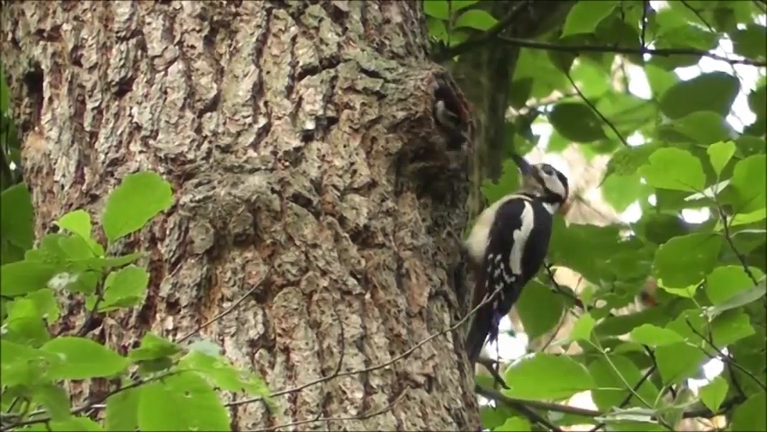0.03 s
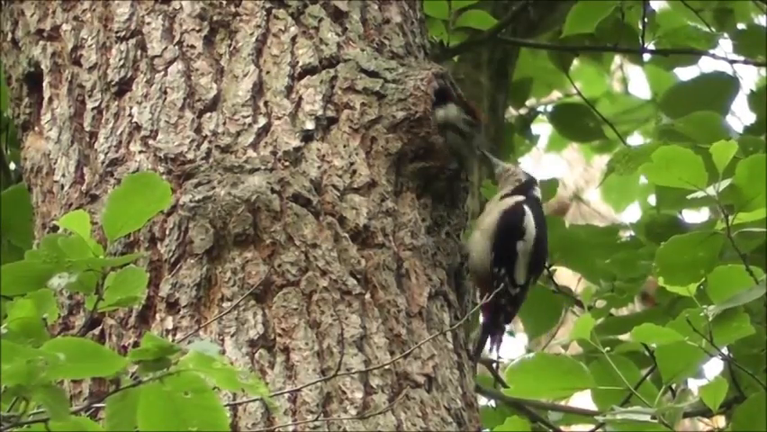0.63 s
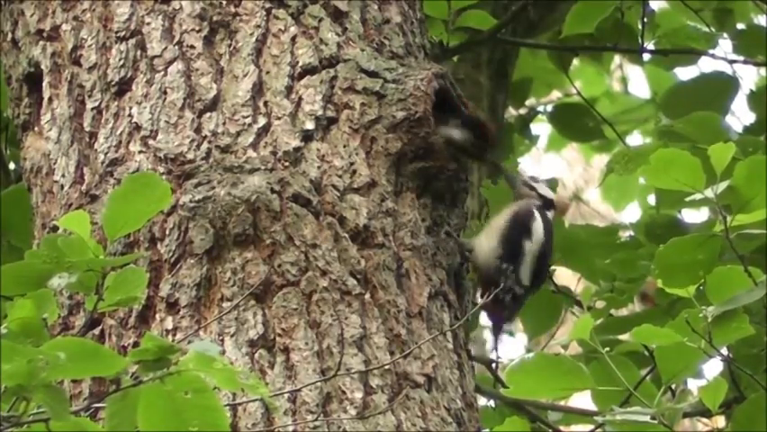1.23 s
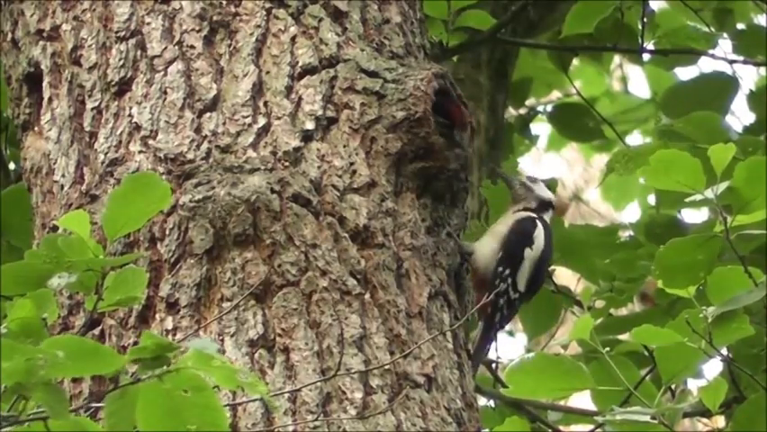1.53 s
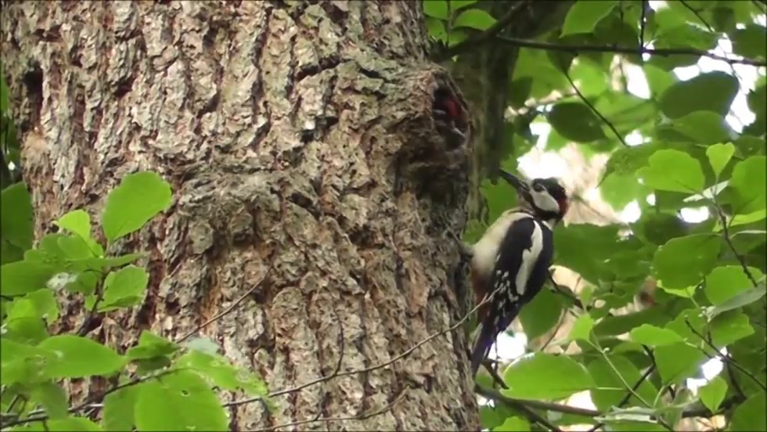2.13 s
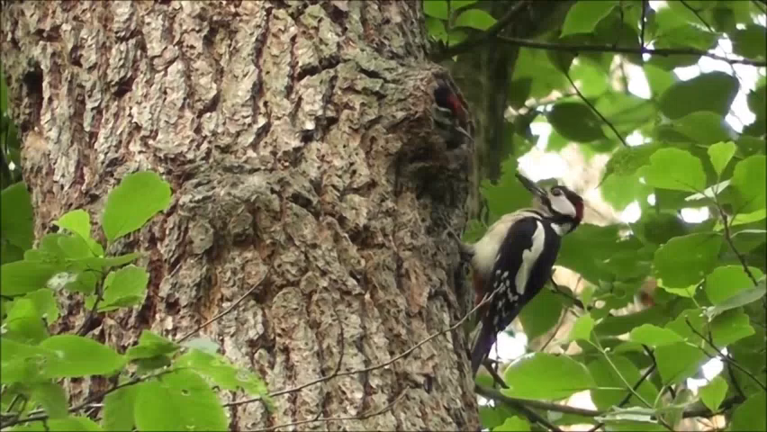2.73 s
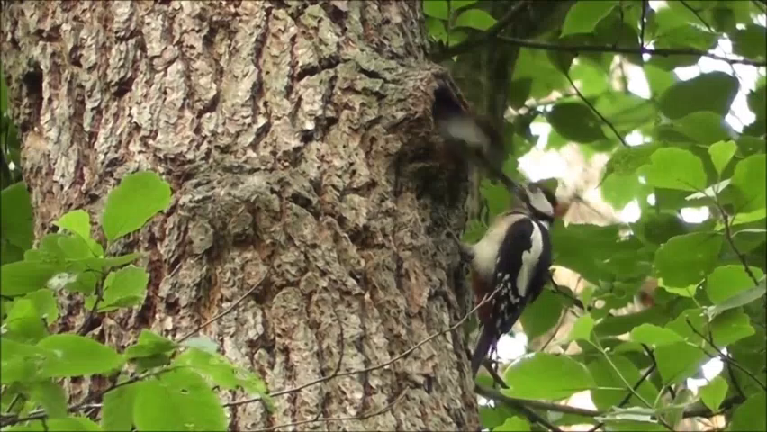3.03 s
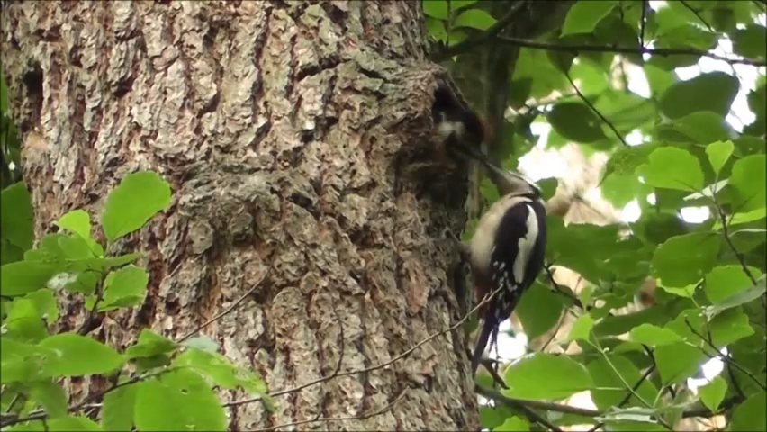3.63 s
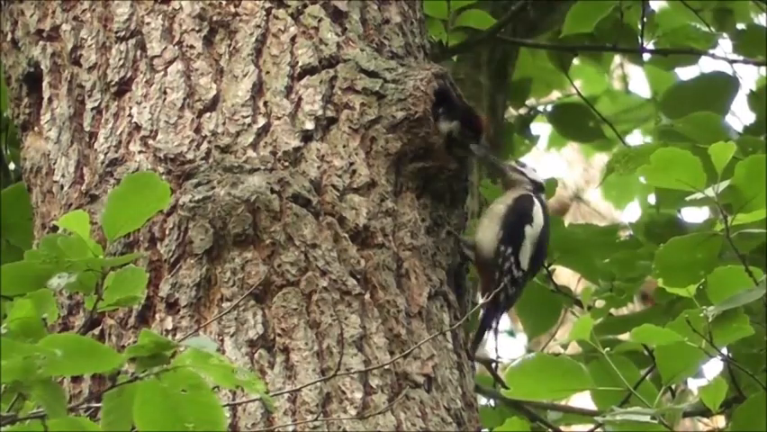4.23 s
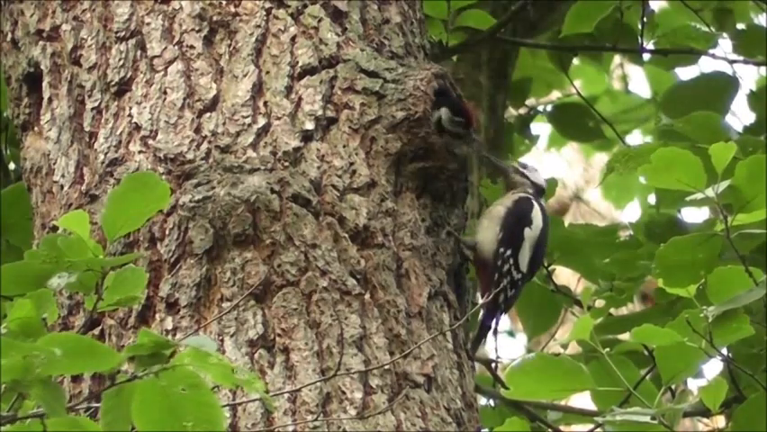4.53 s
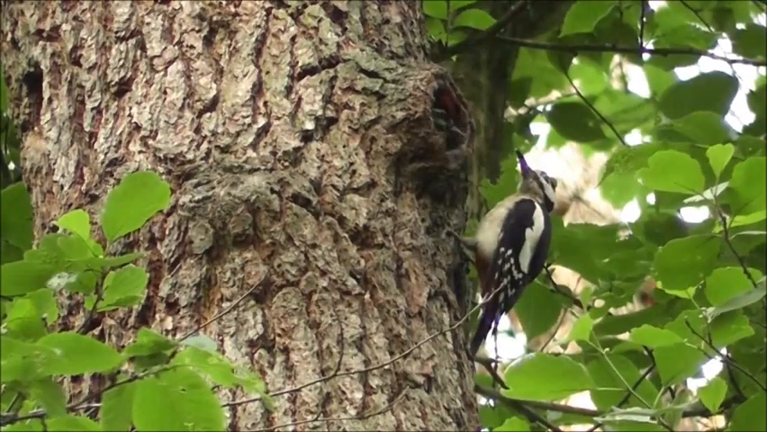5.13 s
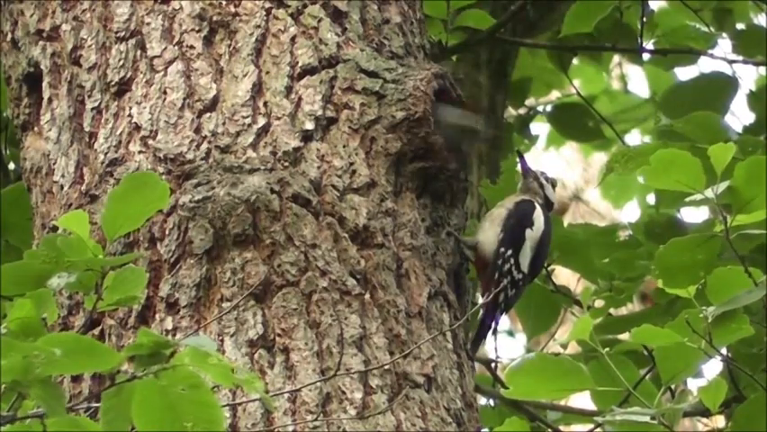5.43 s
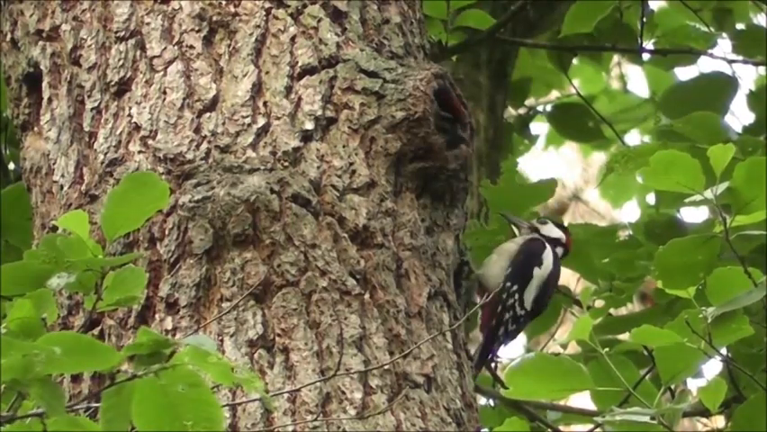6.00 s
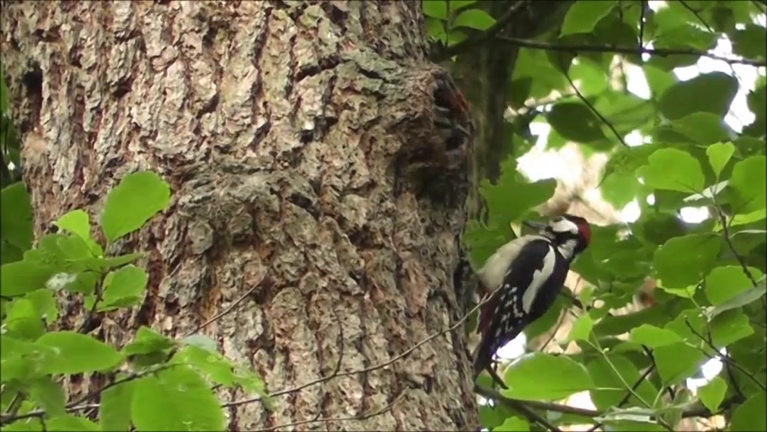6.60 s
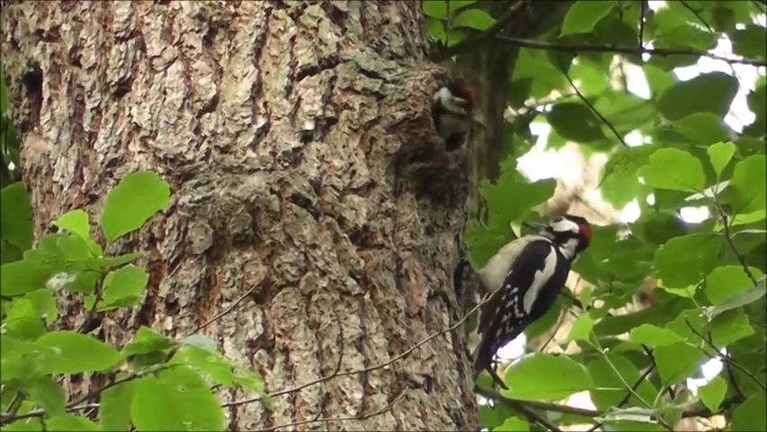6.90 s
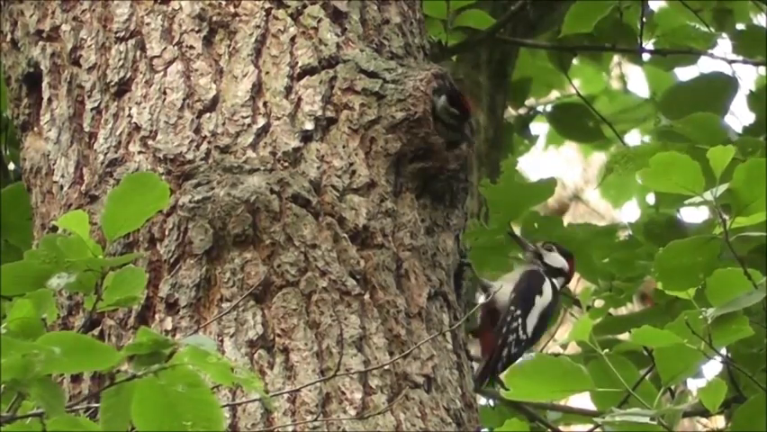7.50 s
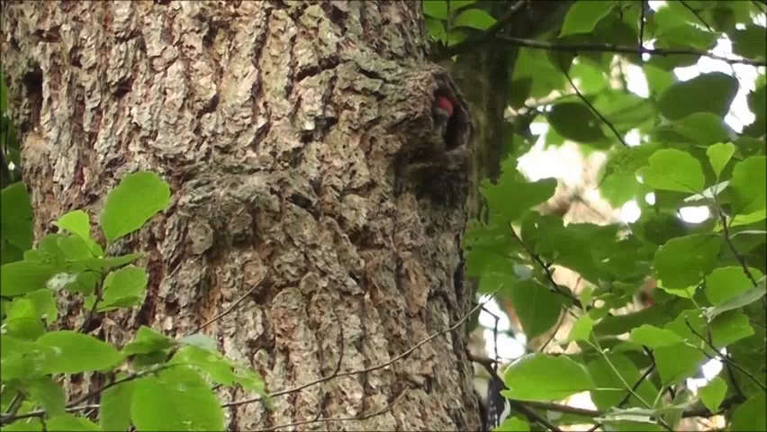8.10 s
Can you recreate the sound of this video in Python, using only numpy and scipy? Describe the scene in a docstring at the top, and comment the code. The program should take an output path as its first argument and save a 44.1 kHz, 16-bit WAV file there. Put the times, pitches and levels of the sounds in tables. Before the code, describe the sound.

A woodpecker chick begs from its nest hole with sharp, high, squeaky chirps, three or four a second, from start to finish. Each call rings briefly among the trunks and leaves, and a few crack. A nearby songbird whistles a quick phrase at the start; in the second half other birds answer from far off. The birds sound straight ahead, over faint hiss and treetop wind.

```python
"""In a wood, a woodpecker chick begs from its nest hole in a tall trunk.
Each sharp chirp is a squeak, then a quick arch of pitch, rich in overtones, as air pressure swells
and drops; a few crack. Trunks and leaves ring after every call. A songbird whistles nearby at first;
later others answer from far off, over faint air, hiss and treetop wind. The level dips a few times."""
import sys
import numpy as np
from scipy import signal
from scipy.fft import rfft, irfft, next_fast_len
from scipy.io import wavfile
from scipy.ndimage import uniform_filter1d

SR = 44100
rng = np.random.default_rng(int(sys.argv[2]) if len(sys.argv) > 2 else 0)


def master(y):
    """Save y as 16-bit WAV."""
    cut = np.clip(np.atleast_2d(y).T, -1, 1)
    pcm = np.round(cut * 32767)  # scale
    wavfile.write(sys.argv[1], SR, pcm.astype(np.int16))


N = 368235

# Chick's chirps. Each row: start in seconds, nominal length in seconds, top pitch in Hz,
# relative level in dB, brightness in dB, squeak level in dB, crack from 0 to 1.
CHIRPS = [(0.017, 0.052, 2426, -36, 9, -56.5, 0.03), (0.234, .06, 2514, -39, 11, -55, 0.09),
          (0.471, 0.058, 2615, -40, 11.5, -51.5, 0.01), (.702, .062, 2384, -39, 1, -53.5, 1),
          (0.977, 0.06, 2475, -38, 8.5, -51.5, 0), (1.253, 0.063, 2466, -39.5, 7, -55, 0.03),
          (1.492, 0.065, 2514, -37, -1.5, -51.5, 0.09), (1.784, 0.05, 2485, -39, 5, -51.5, 0),
          (2.081, 0.046, 2460, -39, 3.5, -62, 0.68), (2.282, 0.047, 2610, -39.5, 10.5, -54, 0.04),
          (2.534, 0.046, 2557, -37.5, 10.5, -45.5, 0.14), (2.844, 0.056, 2480, -39.5, 9.5, -55.5, 0),
          (3.09, 0.067, 2433, -41, 9.5, -59, 0.01), (3.301, .055, 2540, -43, -1, -64, 1),
          (3.566, 0.069, 2562, -36, 5.5, -46.5, 0.02), (3.861, 0.066, 2403, -37.5, 8, -55, 0.08),
          (4.133, 0.064, 2409, -35.5, 2, -47.5, 0.17), (4.427, .055, 2416, -40, 8, -51.5, 0.07),
          (4.718, 0.055, 2398, -39, 6.5, -56, 0.03), (4.961, 0.043, 2618, -36, 10, -45.5, 0),
          (5.28, 0.052, 2447, -42.5, 9, -57, 0.03), (5.527, .064, 2502, -42, 10.5, -56.5, 0.02),
          (5.72, 0.065, 2480, -38, 7, -45.5, 0.63), (6.048, 0.063, 2426, -39, 4, -62, 0),
          (6.371, 0.044, 2420, -35, -1, -51.5, 0.03), (6.717, 0.045, 2491, -38.5, 6.5, -65, 0.03),
          (6.949, 0.059, 2498, -36.5, 8, -58, 0), (7.272, 0.059, 2573, -38, 9.5, -54, 0),
          (7.539, 0.068, 2433, -39.5, 7.5, -55.5, 0), (7.758, 0.054, 2442, -40.5, 9, -59, 0.04),
          (7.986, 0.057, 2626, -38.5, 10, -54, 0), (8.266, 0.052, 2510, -39, 8, -65, 0)]
# Chick's peep. Each row: start in seconds, length in seconds, pitch in Hz, level in dB.
PEEPS = [(3.276, .02, 3520, -41.5)]
# Throat and open beak. Each row: frequency in Hz, gain in dB.
THROAT_DB = [(1100, -15), (1700, -8.5), (2400, 9), (3200, 3.5), (4100, -5.5), (4800, -6), (5700, 0.5),
             (6500, 5), (7300, 6.5), (8400, 9), (9800, 13.5), (12000, 10.5), (15500, 2)]
# Air through the throat. Each row: frequency in Hz, relative density in dB.
RASP_DB = [(500, -72), (1200, -4), (2200, 11.5), (3500, 3.5), (5000, 0.5), (7000, 9), (9500, -0.5),
           (12500, -5), (15800, -17)]

# Chick's voice. One entry per harmonic, fundamental first.
HARMONICS_DB = [-3, -1.3, -1, -12, -24.5, -33.5]  # at the top of a usual arch
EFFORT_SHARE = [.7, 1.32, 1.06, 0.95, 0.85, 1]  # dB per dB of effort
BRIGHT_SHARE = [0, 0.13, 1.01, 1.33, 1.26, 1.23]  # dB per dB of brightness
STRAIN_DB_PER_KHZ = [-24, 31, -4, -24, -6, -5]  # higher calls trade fundamental for octave
SLACK_DB = [5, -14, -27, 1.5, 17, 17]  # per unit of pitch sag, as the membranes slacken
FADE_SHARE = [0.11, 1, 0.42, 0.31, 1, 1]  # the fundamental lingers longest
CRACK_LOSS_DB = [2.5, 11.3, 60, 31, 31, 28]  # in a full crack
FORCED_GAIN_DB = [4.5, 7.5, 9, 11.5, 11, 11]  # on the flanks of a full crack
SQUEAK_HARMONICS_DB = [-1.5, 2, -4.5, -6, -7]  # against the squeak's level

# Near songbird. Each row: start, glide and hold in seconds, first and held pitch in Hz,
# relative level in dB.
SONG_NOTES = [(-.02, 0.095, 0.043, 3050, 3460, -36), (.15, 0.064, 0.075, 5760, 3993, -41.5),
              (.295, .042, 0.085, 3960, 3362, -40), (.51, .064, 0.031, 4210, 2783, -37),
              (.6, 0.049, 0.0092, 2820, 3086, -33), (.778, 0.039, 0.076, 4510, 3668, -32),
              (.935, 0.098, 0.03, 2847, 3313, -35.5), (1.102, 0.047, 0.011, 3850, 3440, -32.5),
              (1.29, .015, 0.044, 2880, 2835, -32.5), (1.345, 0.058, 0.032, 2838, 3290, -38)]
# Thin whistle, two level notes. Each row: as in SONG_NOTES.
THIN_NOTES = [(6.46, 0.031, 0.148, 5020, 5010, -42.5), (6.63, .03, 0.14, 4975, 5005, -41.5)]
# Far birds. Each row: start and length in seconds, first and last pitch in Hz, relative level in dB.
FAR_SLURS = [(4.638, .14, 5900, 5330, -60), (4.644, .058, 3300, 3070, -57), (4.888, .046, 4700, 3980, -52),
             (5.219, .042, 3100, 2820, -49), (5.223, .037, 4800, 3930, -53), (5.39, .05, 4700, 4040, -51),
             (5.478, .049, 3000, 2790, -51), (5.879, .09, 3200, 3120, -53),
             (5.886, .065, 4600, 3934, -51.5), (6.23, .052, 3700, 3060, -51.5),
             (6.347, .4, 1950, 1975, -63.5), (6.558, .1, 3200, 2730, -51), (6.77, .16, 3100, 2804, -53.5),
             (7.679, .052, 3500, 3270, -54)]
# Warbler deep in the wood. Each row: time in seconds, relative level in dB.
WARBLER_DB = [(4.4, -70), (4.7, -65), (5.299, -51.5), (6, -62), (6.7, -59), (7.1, -74), (7.699, -55),
              (8.2, -73)]

# Decay of the wood's ringing. Each row: frequency in Hz, T60 in seconds.
WOOD_T60_S = [(1200, 0.09), (2400, 0.9), (3300, 1.66), (5100, 0.88), (7500, 0.72), (10000, 0.55),
              (15000, 1.13)]
# Strength of that ringing. Each row: frequency in Hz, gain in dB.
WOOD_COLOUR_DB = [(1200, 3), (2400, -2.5), (3700, -0.5), (5100, 5.5), (6000, 5), (7500, -2), (10000, -3),
                  (15000, 0)]
# Still air and hiss. Each row: frequency in Hz, relative density in dB.
AIR_COLOUR_DB = [(20, -26), (60, 4), (100, 1.5), (150, -1), (240, -1), (450, 0), (900, -2), (2000, -1.5),
                 (4000, -4), (8000, -5), (12000, -6.5), (15800, -5.5)]
# Stereo likeness of the air. Each row: frequency in Hz, left-right correlation.
AIR_CORRELATION = [(40, 0.99), (120, 0.68), (250, 0.58), (500, 0.14), (1000, 0.39), (2500, 0.99), (5000, 1),
                   (8000, 0.86), (14000, 0.286)]
# Far treetop wind. Each row: time in seconds, relative level in dB.
WIND_DB = [(0, -78), (.7, -71), (1.4, -78), (2.098, -72.5), (3.2, -70.5), (4, -75.5), (4.8, -70.5),
           (5.5, -73), (6, -87), (8.35, -81)]
# Brief level dips. Each row: centre in seconds, half width in seconds, depth in dB.
DIPS = [(2.034, 0.019, 5.5), (3.49, 0.027, 5), (3.531, 0.012, 17.5), (4.379, 0.015, 3.5),
        (8.235, 0.016, 4.5)]


def chirp(start_s, length_s, top_hz, level_db, bright_db, crack):
    """Pressure swells and drops: pitch arches, sweeping harmonics through the throat's resonances."""
    usual_hz, usual_db = 2500, -39
    attack_db, release_db, leak_db = 26, 55.5, -9.5
    beak_hz, beak_width_hz, beak_db = 7524, 340, 2.5
    rise_s = .495 * length_s
    fall_s = length_s - rise_s
    t = np.arange(-1.03 * rise_s, 1.35 * fall_s, 1 / SR)
    u = t / np.where(t < 0, rise_s, fall_s)  # 0 at the top, -1 and 1 at the feet
    sag = np.where(t < 0, .17 * u ** 2 + .186 * u ** 6, .25 * u ** 2 + .2424 * u ** 4)
    sag = np.minimum(sag, .43 + .0855 * np.tanh(np.maximum(sag - .48, 0) / .13))  # pitch settles
    hz = top_hz * (1 - sag)
    fade_db = -release_db * np.maximum(u - .76, 0) - attack_db * np.maximum(-u - .68, 0)
    # A cracked voice chokes just before the top and pushes through on the flanks.
    choke = crack * np.exp(-((u + .29) / .52) ** 4)
    forced = crack * np.exp(-((abs(u) - .86) / .19) ** 2)
    strain_khz = (top_hz - usual_hz) / 1000
    levels_db = []
    for i, own_db in enumerate(HARMONICS_DB):
        harmonic_hz = (i + 1) * hz
        top_db = usual_db + own_db + EFFORT_SHARE[i] * (level_db - usual_db)
        top_db += BRIGHT_SHARE[i] * bright_db + STRAIN_DB_PER_KHZ[i] * strain_khz
        flank_db = SLACK_DB[i] * sag + FADE_SHARE[i] * fade_db
        crack_db = FORCED_GAIN_DB[i] * forced - CRACK_LOSS_DB[i] * choke
        tract_db = at_hz(THROAT_DB, harmonic_hz) - at_hz(THROAT_DB, (i + 1) * top_hz)
        tract_db += beak_db * np.exp(-((harmonic_hz - beak_hz) / beak_width_hz) ** 2)
        levels_db.append(top_db + flank_db + crack_db + tract_db)
    hz = hz * (1 + .0039 * waver(len(t), 77))
    tone = syrinx(hz, levels_db, jitter=.006 + .04 * sag + .015 * choke, flutter_db=1.9 + 5 * sag)
    # Air leaks as the membranes catch and let go.
    leak = .078 + .68 * np.exp(-((u + .8) / .15) ** 2) + .62 * np.exp(-((u - .8) / .2) ** 2)
    breath = leak * noise(len(t), RASP_DB) * signal.windows.tukey(len(t), .06)
    return start_s + rise_s + t[0], tone + gain_of(level_db + bright_db + leak_db) * breath


def squeak(length_s, low_hz, level_db):
    """The membranes start with a puff of air and a rough scoop of pitch."""
    spread, scoop, usual_db = .08, .866, -52
    u = np.linspace(0, 1, round(length_s * SR))
    bottom_hz = low_hz * (1 + spread * rng.standard_normal())
    hz = bottom_hz * (1 + scoop * (u - rng.uniform(.19, .8)) ** 2)
    tone = syrinx(hz, level_db + np.array(SQUEAK_HARMONICS_DB), jitter=.025, flutter_db=2.5)
    puff_db = -51 + .49 * (level_db - usual_db) - 4.4 * u
    return tone + gain_of(puff_db) * noise(len(u), RASP_DB) * signal.windows.tukey(len(u), .08)


def chick(squeak_s=.02):
    """Begging chirps, each led in by a squeak."""
    out = np.zeros(N)
    for start_s, length_s, top_hz, level_db, bright_db, squeak_db, crack in CHIRPS:
        add(out, start_s - squeak_s, squeak(squeak_s, .63 * top_hz, squeak_db))
        add(out, *chirp(start_s, length_s, top_hz, level_db, bright_db, crack))
    return out


def peep():
    """The chick's voice flips to a high, thin note that scoops up to pitch."""
    out = np.zeros(N)
    for start_s, length_s, pitch_hz, db in PEEPS:
        u = np.linspace(0, 1, round(length_s * SR))
        hz = pitch_hz * (1 - .07 * np.exp(-u / .2))
        add(out, start_s, syrinx(hz, [db, db - 7, db - 12], jitter=.004, flutter_db=1.5))
    return out


def syrinx(hz, levels_db, jitter, flutter_db):
    """A bird's vibrating membranes: unsteady pitch, one trembling level per harmonic."""
    count = len(hz)
    phase = 2 * np.pi * np.cumsum(hz * (1 + jitter * waver(count, 940))) / SR
    out = np.zeros(count)
    for k, db in enumerate(levels_db, 1):
        out += gain_of(db + flutter_db * waver(count, 255)) * (k * hz < SR / 2) * np.sin(k * phase)
    return np.sqrt(2) * out * signal.windows.tukey(count, .08)


def songbird(notes, edge_s=.033, glide_db=-1.5):
    """Pure whistles: each glides to pitch, swells on arrival and holds."""
    out = np.zeros(N)
    for start_s, glide_s, hold_s, first_hz, held_hz, db in notes:
        t = np.arange(0, glide_s + hold_s, 1 / SR)
        away = np.cos(np.pi / 2 * np.minimum(t / glide_s, 1)) ** 2
        hz = held_hz + (first_hz - held_hz) * away
        envelope = np.minimum(np.minimum(t, t[-1] - t) / edge_s, 1)
        tone = syrinx(hz, [db + glide_db * np.sqrt(away)], jitter=.003, flutter_db=1.3)
        add(out, start_s, envelope * tone)
    return out


def far_birds():
    """Slurs that glide fast, then level off."""
    out = np.zeros(N)
    for start_s, length_s, first_hz, last_hz, db in FAR_SLURS:
        u = np.linspace(0, 1, round(length_s * SR))
        hz = last_hz + (first_hz - last_hz) * (1 - u) ** 2
        add(out, start_s, syrinx(hz, [db], jitter=.016, flutter_db=3) * np.sin(np.pi * u))
    return out


def warbler(step_s=.07, note_s=.06):
    """A run of short, random slurs."""
    out = np.zeros(N)
    times_s, levels_db = np.transpose(WARBLER_DB)
    starts_s = np.arange(times_s[0], times_s[-1], step_s)
    u = np.linspace(0, 1, round(note_s * SR))
    for start_s, (late, height, glide) in zip(starts_s, rng.random((len(starts_s), 3))):
        hz = (2750 + 1500 * height ** 2) * (1 + .247 * (glide - .6) * u)
        note = syrinx(hz, [np.interp(start_s, times_s, levels_db)], jitter=.0033, flutter_db=7)
        add(out, start_s + .028 * late, note * np.sin(np.pi * u))
    return out


def wood(sound, gap_s=.005, slot_samples=20):
    """Scatter from trunks and leaves: sparse taps, each band decaying at its own rate."""
    slots = np.arange(round(gap_s * SR), SR - slot_samples, slot_samples)
    taps = np.zeros(SR)
    taps[slots + rng.integers(0, slot_samples, len(slots))] = rng.standard_normal(len(slots))
    hz, t, bands = signal.stft(taps, SR, nperseg=256)
    near_trunks = 1 + .7 * np.exp(-(t / .055) ** 2)
    bands = bands * gain_of(-60 * t / at_hz(WOOD_T60_S, hz)[:, None]) * near_trunks
    norm = np.linalg.norm(signal.istft(bands, SR, nperseg=256)[1])
    tail = signal.istft(bands * gain_of(at_hz(WOOD_COLOUR_DB, hz))[:, None], SR, nperseg=256)[1]
    return signal.fftconvolve(sound, tail / norm)[:N]


def head_turn_echoes(calls, directions=3, turn_s=1.4):
    """As the bird turns its head, other trunks throw its calls back."""
    turns = np.arange(N) / SR / turn_s
    facing = [np.cos(2 * np.pi * (turns - k / directions)) for k in range(directions)]
    shares = np.maximum(facing, 0)
    return sum(wood(calls * share) for share in shares / np.linalg.norm(shares, axis=0))


def air(level_db=-52, uneven_db=1.55):
    """Faint stir and hiss, gently uneven, partly alike in both ears."""
    frames, hz = N // 256 + 5, np.fft.rfftfreq(1024, 1 / SR)
    left_re, left_im, own_re, own_im, patches = rng.standard_normal((5, frames, len(hz)))
    patches = uniform_filter1d(patches, size=24, axis=0)
    patches = unit_rms(uniform_filter1d(patches, size=8, axis=1))
    correlation = np.clip(at_hz(AIR_CORRELATION, hz), -1, 1)
    left = left_re + 1j * left_im
    right = correlation * left + np.sqrt(1 - correlation ** 2) * (own_re + 1j * own_im)
    bands = np.array([left, right]) * gain_of(at_hz(AIR_COLOUR_DB, hz) + uneven_db * patches)
    pair = signal.istft(bands.transpose(0, 2, 1), nperseg=1024, noverlap=768)[1]
    return gain_of(level_db) * unit_rms(pair[:, :N])


def treetop_wind():
    """A low murmur of distant wind that comes and goes, partly different in each ear."""
    colour_db = [(60, -44), (150, -15.5), (200, 2.5), (275, -.5), (380, -5.5), (900, -74), (3000, -60)]
    shared = noise(N, colour_db)
    pair = np.array([1.36 * shared + .71 * noise(N, colour_db) for ear in range(2)])
    return pair * gain_of(np.interp(np.arange(N) / SR, *np.transpose(WIND_DB)))


def noise(count, colour_db):
    """Coloured noise, rms about 1."""
    size = next_fast_len(count)
    shape = gain_of(at_hz(colour_db, np.fft.rfftfreq(size, 1 / SR)))
    return unit_rms(irfft(rfft(rng.standard_normal(size)) * shape, size))[:count]


def waver(count, cutoff_hz):
    """Low-passed random drift, rms about 1."""
    size = next_fast_len(max(count, 8192))
    shape = np.exp(-(np.fft.rfftfreq(size, 1 / SR) / cutoff_hz) ** 2)
    return unit_rms(irfft(rfft(rng.standard_normal(size)) * shape, size))[:count]


def gain_of(db):
    """Decibels to gain."""
    return 10 ** (np.asarray(db) / 20)


def unit_rms(x):
    """Scales to rms 1."""
    return x / np.sqrt(np.mean(x ** 2) + 1e-20)


def at_hz(table, hz):
    """Interpolates on a log-frequency axis."""
    table_hz, values = np.transpose(table)
    return np.interp(np.log(hz + 1), np.log(table_hz + 1), values)


def add(mix, start_s, sound):
    """Mixes a sound in at start_s."""
    start = round(start_s * SR)
    sound = sound[max(-start, 0):]
    part = mix[max(start, 0):][:len(sound)]
    part += sound[:len(part)]


def scene():
    """Birds and their echoes straight ahead; air and wind in stereo."""
    calls, high_peep = chick(), peep()
    song, thin, far = songbird(SONG_NOTES), songbird(THIN_NOTES), far_birds()
    birds = gain_of(-.63) * calls + gain_of(-4) * head_turn_echoes(calls)
    birds += high_peep + gain_of(-8) * wood(high_peep)
    birds += gain_of(-4) * song + gain_of(-1.5) * wood(song)
    birds += gain_of(-7) * thin + gain_of(-16) * wood(thin)
    birds += gain_of(1) * far + gain_of(.5) * wood(far)
    birds += gain_of(1.5) * wood(warbler())  # so far off that only echoes arrive
    return birds + air() + treetop_wind()


def record(dry):
    """Brief level dips, then a band limit."""
    cutoff_hz = 15850
    t = np.arange(N) / SR
    dip_db = sum(db * np.exp(-((t - centre_s) / width_s) ** 2) for centre_s, width_s, db in DIPS)
    lowpass = signal.firwin(511, cutoff_hz, window=("kaiser", 9), fs=SR)
    return signal.oaconvolve(dry * gain_of(-dip_db), lowpass[None], "same")


dry = scene()
out = record(dry)
master(out)
```